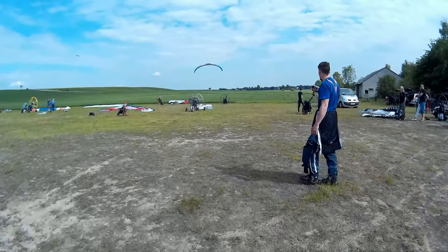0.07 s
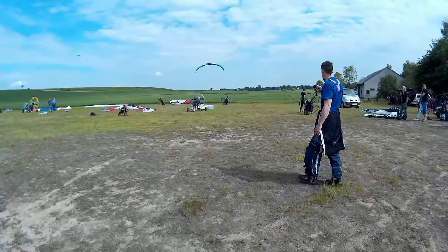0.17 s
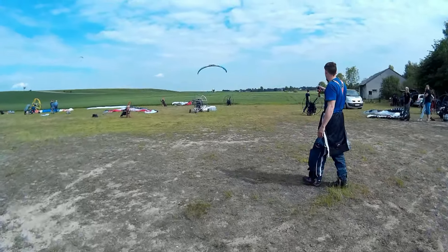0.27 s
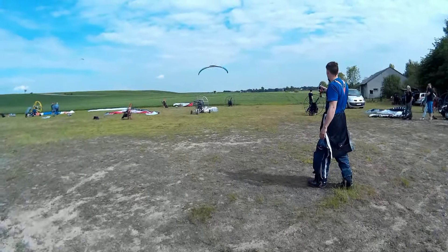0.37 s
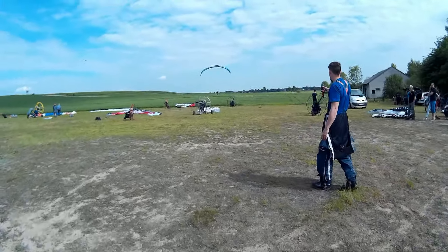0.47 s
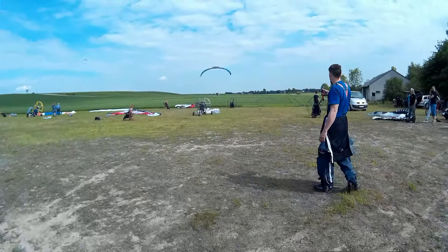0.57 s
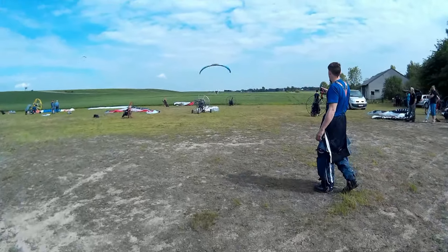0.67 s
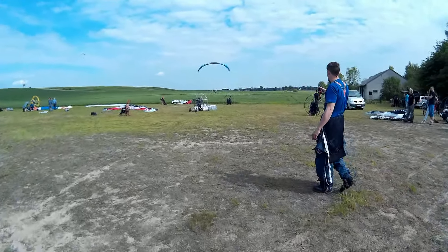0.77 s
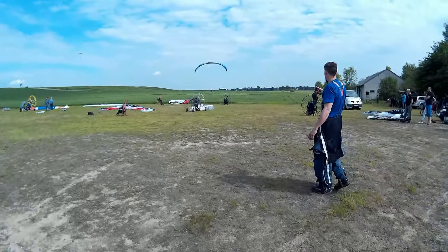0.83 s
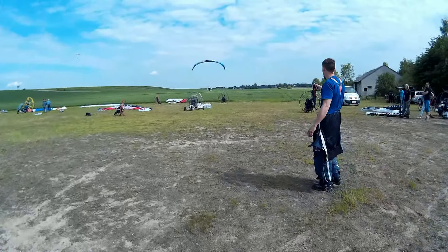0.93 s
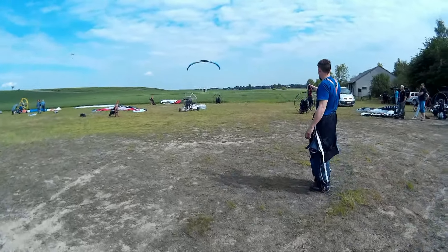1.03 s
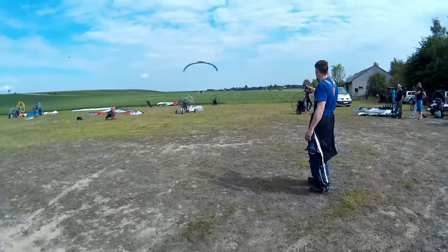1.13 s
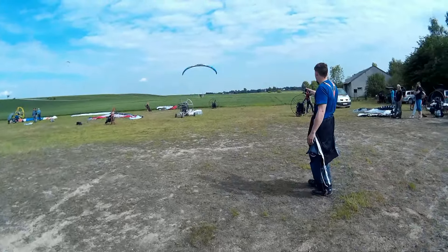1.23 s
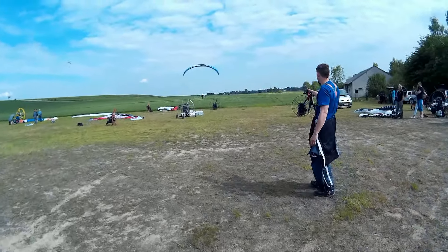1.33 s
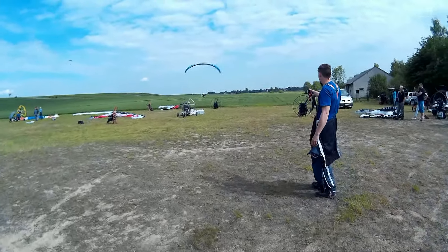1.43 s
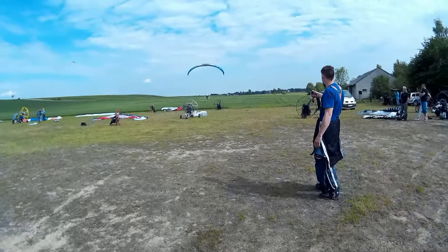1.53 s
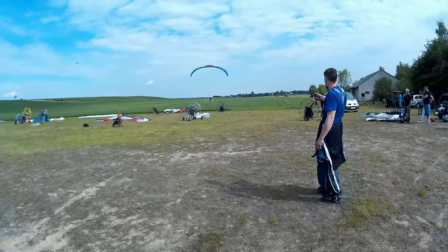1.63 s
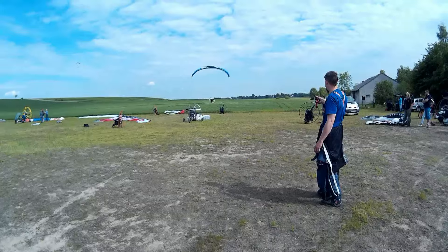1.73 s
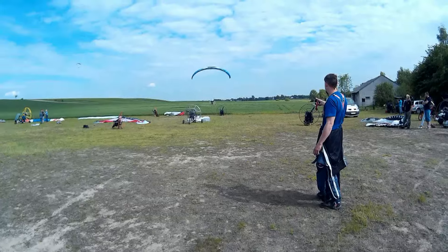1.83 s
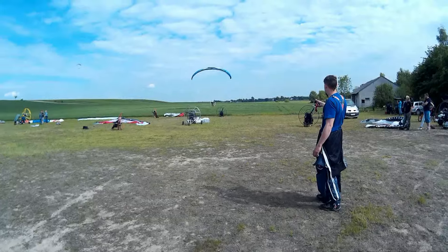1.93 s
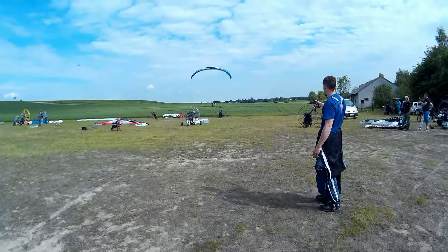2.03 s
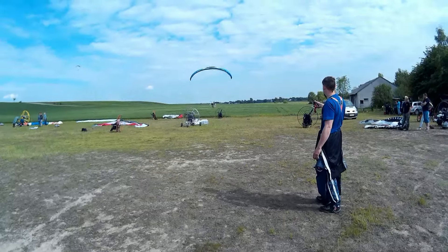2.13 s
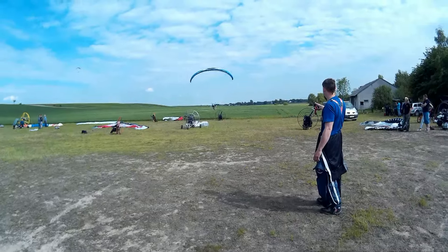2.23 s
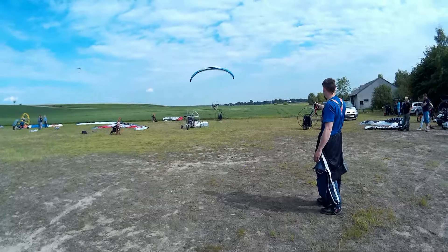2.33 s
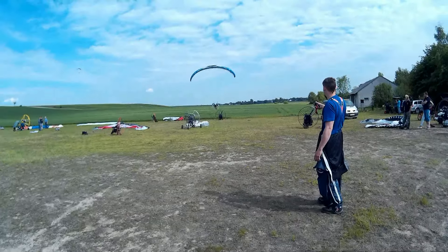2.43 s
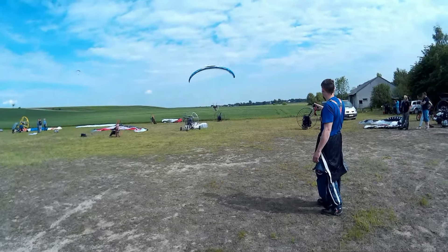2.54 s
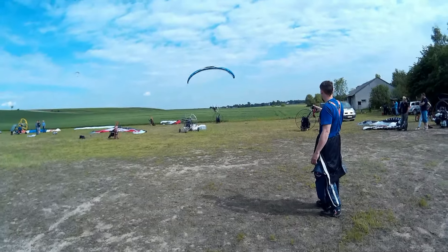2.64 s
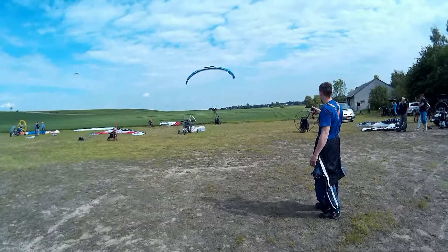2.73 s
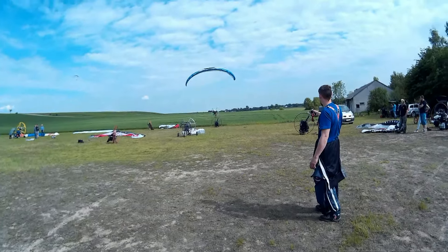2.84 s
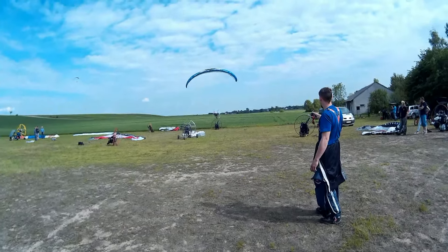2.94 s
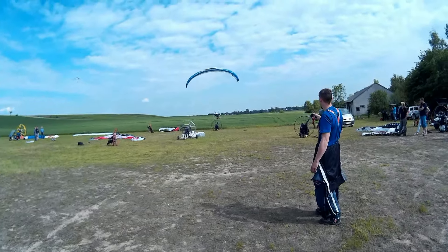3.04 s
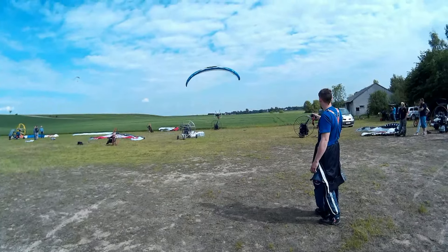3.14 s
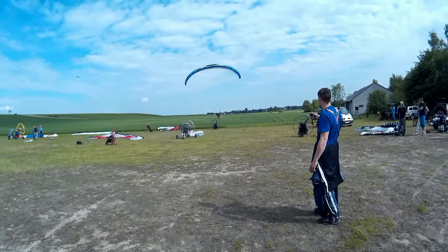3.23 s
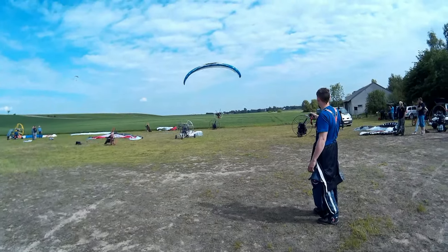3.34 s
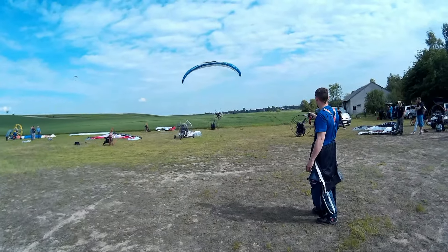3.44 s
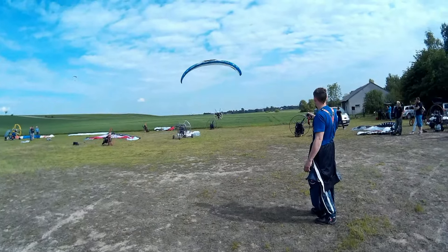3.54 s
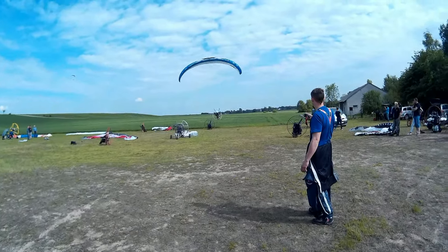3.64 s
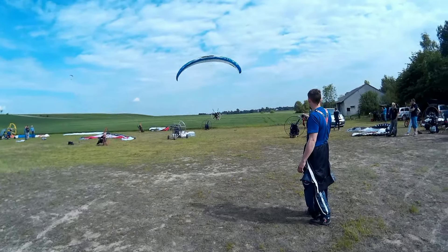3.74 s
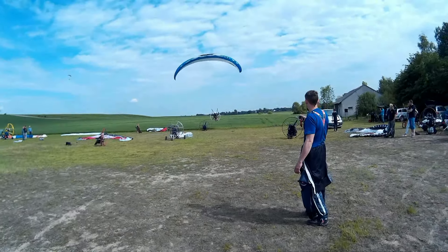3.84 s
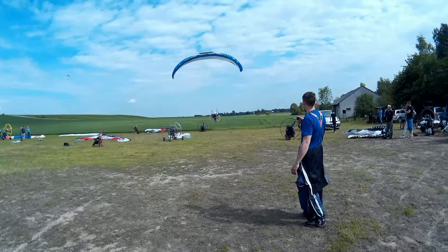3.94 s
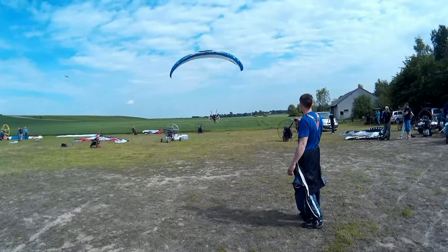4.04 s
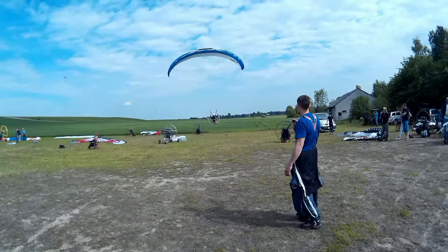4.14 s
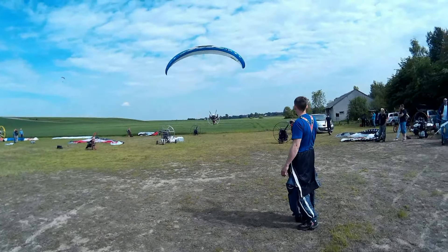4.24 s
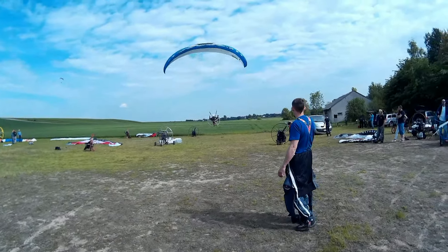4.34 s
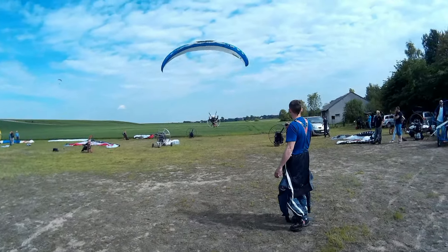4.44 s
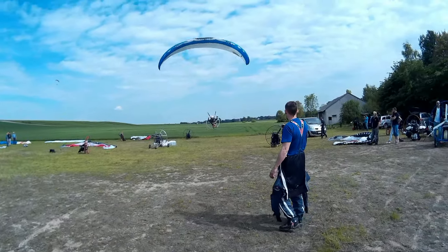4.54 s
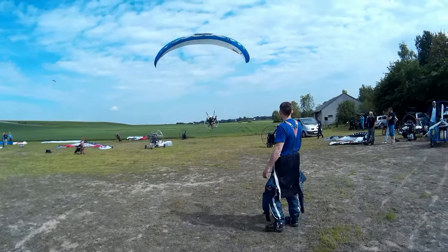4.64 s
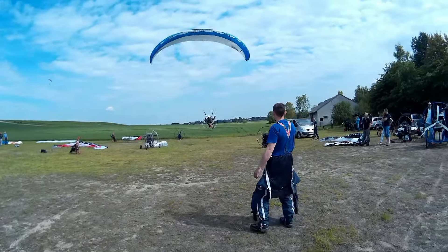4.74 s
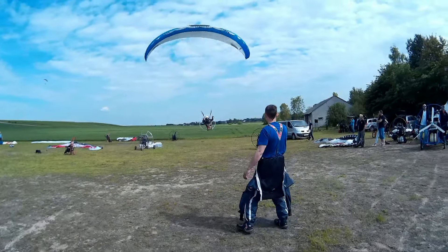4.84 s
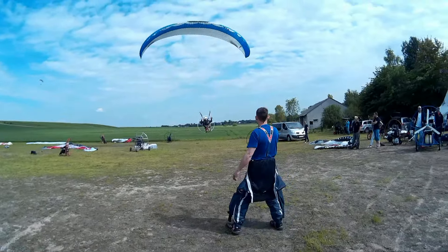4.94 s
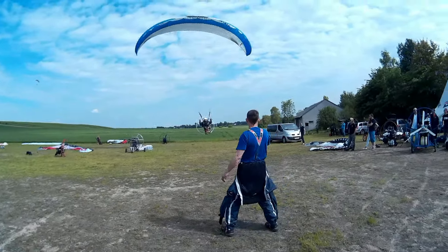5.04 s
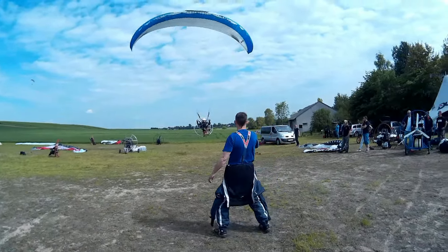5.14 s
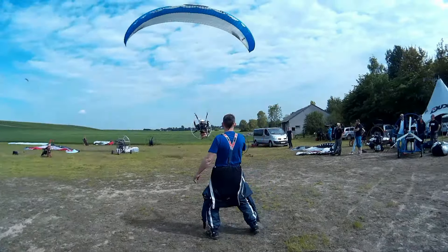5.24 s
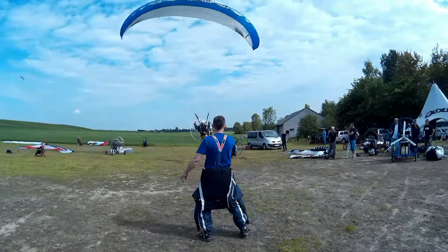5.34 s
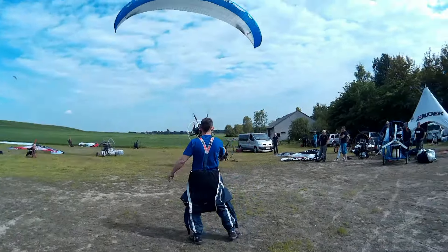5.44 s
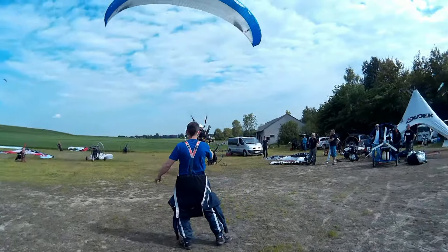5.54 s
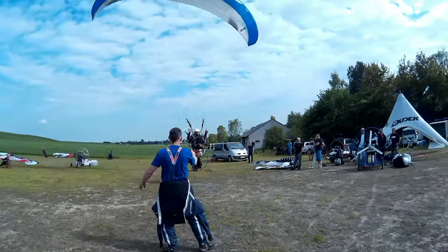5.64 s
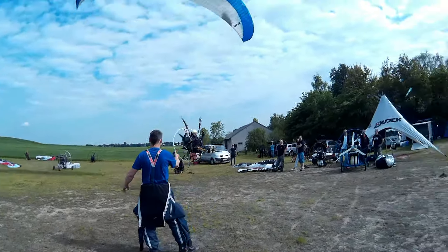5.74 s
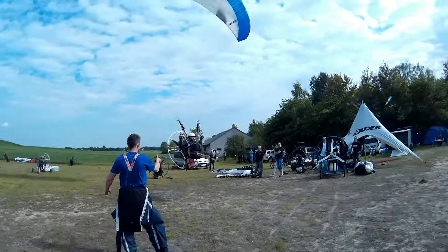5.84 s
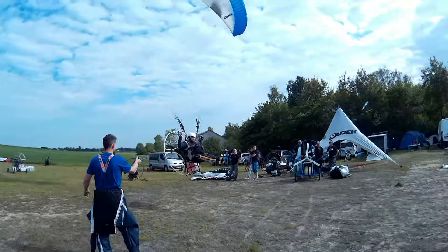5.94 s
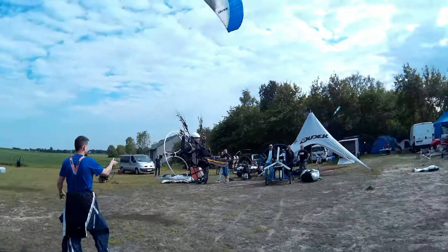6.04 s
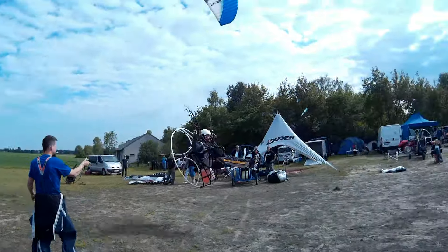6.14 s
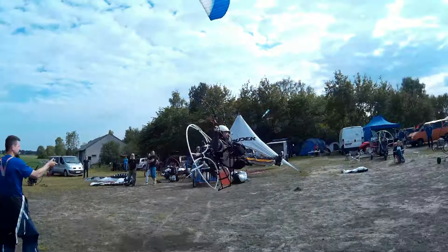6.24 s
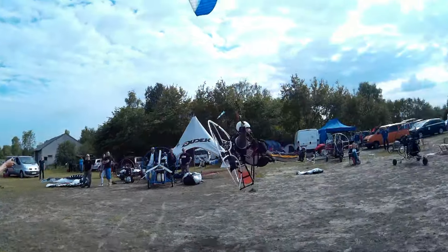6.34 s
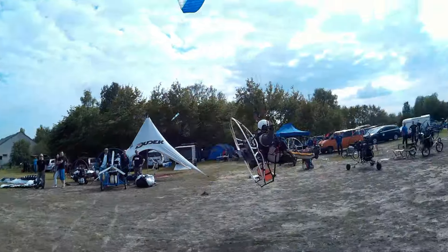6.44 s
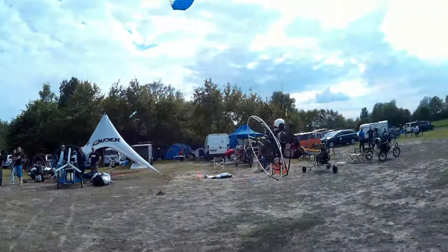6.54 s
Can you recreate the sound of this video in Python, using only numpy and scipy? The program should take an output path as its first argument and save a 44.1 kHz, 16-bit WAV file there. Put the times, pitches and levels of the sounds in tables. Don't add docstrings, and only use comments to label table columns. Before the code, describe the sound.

A paramotor flies in over open grassland toward a small camera. Its thin, nasal two-stroke buzz starts distant beneath gusty low wind rumble and a few soft knocks on the camera body. The pitch sags, recovers louder, then sags deeper with a ragged, airy roar. Power returns and the raspy propeller swells steadily, passing close and loud with a slight drop in pitch at the end.

```python
import sys
import numpy as np
from scipy import signal
from scipy.fft import rfft, irfft, next_fast_len
from scipy.io import wavfile
from scipy.ndimage import uniform_filter1d

SR = 44100
rng = np.random.default_rng(int(sys.argv[2]) if len(sys.argv) > 2 else 0)


def nominal_scale(level):
    x = np.asarray(level, float) / 20
    return 10 ** x


def store_wav(level_fs):
    pcm = np.round(np.clip(np.atleast_2d(level_fs), -1, 1) * 32767)
    wavfile.write(sys.argv[1], SR, pcm.T.astype(np.int16))


N = 291055
T = np.arange(N) / SR
GEAR = 1.4


def curves(table):
    s, *columns = np.transpose(table)
    return [np.interp(T, s, c) for c in columns]


def walk(rate_hz):
    fine = 8
    held = np.repeat(rng.standard_normal(int(T[-1] * rate_hz) + 2), fine)
    slewed = uniform_filter1d(uniform_filter1d(held, size=fine), size=fine)
    return np.interp(T * rate_hz * fine, np.arange(len(held)), 1.3 * slewed)


def noise(colour, centre_hz=None):
    size = next_fast_len(N)
    octave = np.log2(np.arange(1, size // 2 + 2) * SR / size)
    point_hz, point_db = np.transpose(colour)
    gain = nominal_scale(np.interp(octave, np.log2(point_hz), point_db))
    if centre_hz:
        thirds_away = np.clip((octave - np.log2(centre_hz)) * 3, -1, 1)
        gain = gain * np.cos(np.pi / 2 * thirds_away)
    spectrum = rfft(rng.standard_normal(size)) * gain
    return irfft(spectrum, size)[:N] * np.sqrt(SR / 2)


def ring(hz, width_hz, level_db, patchy_db):
    peak = noise([(hz / 3, -90), (hz - width_hz, -12), (hz, 0), (hz + width_hz, -12), (hz * 2, -90)])
    return nominal_scale(level_db + patchy_db * walk(17)) * peak / np.sqrt(width_hz)


# time in seconds, blade passes in Hz.
THROTTLE = [(0, 87.16), (.6, 87.7), (1.08, 95.2), (1.51, 83.8), (1.76, 83.04), (2.0, 73.78), (2.46, 72.6),
            (2.85, 85.2), (3.2, 87.8), (3.78, 84.03), (4.0, 64.77), (4.18, 59.05), (4.34, 58.1),
            (4.55, 70.27), (4.8, 79.25), (5.12, 85.92), (5.5, 88.97), (5.75, 81.02)]


def blade_pass_hz():
    inertia_s, pass_s, pass_width_s, doppler = .1, 6.4, .09, .024
    steady = uniform_filter1d(curves(THROTTLE)[0], size=int(inertia_s * SR))
    return steady * (1 - doppler * (1 + np.tanh((T - pass_s) / pass_width_s)))


# time in seconds, level in dB, churn of the air in dB, bite of the throttle in dB,
# side turned to the camera (0-1).
FLIGHT = [(0, -43, -1.5, -1, 0.07), (1.0, -41, -0.5, 1.5, 0.16), (1.7, -37.5, -3.5, -2.5, 0.21),
          (2.05, -42, 0.5, -2.5, 0), (2.45, -40, 0, -2, 0), (2.7, -34.5, 0, -4, 0),
          (3.0, -34, -0.5, 4.5, 0.06), (3.4, -35.5, -2, 5.5, 0.19), (3.75, -35, 1.5, 4.5, 0.26),
          (4.0, -38, 5.5, 2, 0.14), (4.3, -35.5, 6, -1.5, 0.2), (4.6, -34, 9, 1.5, 0.12),
          (5.0, -32, 4, -1, 0.34), (5.3, -32, -2, -5.5, 0.45), (5.72, -28.5, -5.5, -4, 0.56),
          (5.9, -26, -1, -2, 0.48), (6.15, -24.5, 1, 2.5, 0.81), (6.6, -24, 2, 3, 1)]


def mix(rows):
    level, churn, bite, side = curves(FLIGHT)
    return [level + db + a * churn + b * bite + side_db * side for db, a, b, side_db in rows]


# time in seconds, low dip in Hz, its depth in dB, high dip in Hz, its depth in dB.
DIPS = [(0, 292, 23, 810, -0.5), (1.2, 274, 13, 840, 8.5), (1.6, 291, 15.5, 810, 15),
        (2.4, 273, 28, 860, 7), (2.75, 300.9, 18, 725, -2), (3.0, 286, 19, 680, 7),
        (3.4, 265, 7, 650, 4), (3.6, 270, 0, 730, 16), (4.0, 280, -2.5, 700, 28),
        (4.4, 273, 3, 690, 7), (4.55, 279, 11, 560.5, 3), (5.0, 300.7, 9.5, 544.2, 8),
        (5.35, 293.2, 0, 720, 4), (5.7, 268.5, 6, 747, 12), (6.0, 254.6, 10.5, 840.3, 0),
        (6.2, 244.8, 12, 1052, 6), (6.5, 308.9, 14, 1000, 3)]


def dips_db(hz):
    def dip(centre_hz, depth_db, octaves):
        return np.maximum(depth_db, 0) * np.exp(-(np.log2(hz / centre_hz) / octaves) ** 2)

    low_hz, low_db, high_hz, high_db = curves(DIPS)
    return -dip(low_hz, low_db, 0.3) - dip(high_hz, high_db, 0.15)


# time in seconds, factor.
ROUGH = [(0, 1.2), (2.35, 1.3), (2.55, .8), (3.8, .7), (4.1, .9), (4.45, .75), (4.8, .6), (6.6, .55)]


def stack(turns, levels_db, slow_db, quick_db, jitter, blur):
    rough = curves(ROUGH)[0]
    shift = jitter * rough * walk(25)
    out = 0
    for k, db in enumerate(levels_db, 1):
        waver = min(k / 8, 1)
        smear = .06 * k * rough ** 2 * walk(30)
        phase = 2 * np.pi * k * (turns + shift) + blur * waver * walk(4) + smear
        swing_db = np.minimum(slow_db * walk(3) + quick_db * rough * walk(12), 3)
        out = out + np.sqrt(2) * nominal_scale(db + waver * swing_db) * np.cos(phase)
    return out


# level beside the flight in dB, share of churn, share of bite, change when side on in dB.
THUMP_MIX = [
    (-15.5, -0.037, 0.054, 12),
    (-6.5, -0.23, 0, 4.5),
    (-8.5, 0, 0.035, -3.5),
]
BUZZ_MIX = [
    (-9, 0.065, 0.37, -3.5),
    (-7.5, -0.011, 0.75, -16),
    (-14, -0.1, 0.043, -7.5),
    (-16, -0.34, 0.39, -6.5),
]
TIP_MIX = [(-4.5, 0, 0.63, -11.5)]
THRUST_DB = [1, 17, -4.5, -2, -4.5]
# time in seconds, level in dB.
BEAM = [(0, -1), (1.0, 0), (1.6, 1), (2.4, -0.5), (2.6, 0.5), (3.1, 4), (3.7, 3.5), (4.0, -1), (4.3, 0),
        (4.7, 7.5), (5.0, 7), (5.5, 5), (5.9, 4), (6.2, -2), (6.6, 3)]
# frequency in Hz, level in dB.
BUZZ_COLOUR = [(450, -2), (650, 1), (800, 0), (950, 0), (1150, -6), (1400, -7), (1700, -4.5), (2100, -19),
               (2600, -15.5)]


def propeller(turns, hz):
    cruise_hz = 87
    octaves = np.log2(hz / cruise_hz)
    beam = curves(BEAM)[0]
    fourth, fifth, middle, high = mix(BUZZ_MIX)
    tips = mix(TIP_MIX)[0] - curves(FLIGHT)[0]
    thrust = mix(THUMP_MIX) + [fourth, fifth]
    levels = [db + gain_db * octaves for db, gain_db in zip(thrust, THRUST_DB)]
    colour_hz, colour_db = np.transpose(BUZZ_COLOUR)
    for k in range(6, 29):
        buzz = middle + 0.2 * beam if k < 9 else high + beam
        tip_share = np.clip((k - 13) / 4, 0, 1)
        levels.append(buzz + tips * tip_share + np.interp(k * hz, colour_hz, colour_db))
    for k in range(1, 15):
        levels[k - 1] = levels[k - 1] + dips_db(k * hz)
    return stack(turns, levels, slow_db=1.0, quick_db=2.5, jitter=0.009, blur=1.11)


EXHAUST_MIX = [
    (-16.5, 0.018, 0.094, 0),
    (-26, 0.01, 0.035, 22),
    (-32, 0.0081, 0.43, 15),
]
# multiple of the firing rate, level beside its mix in dB.
SILENCER = [(2, -19), (3, -18), (5, -3), (6, -1.5), (7, 7), (8, 9), (9, 6.5), (10, 4.5), (11, -4.5),
            (12, 1.5), (13, -12.5), (14, -25), (15, -10), (16, -12.5)]
# time in seconds, 4th multiple in dB, 5th in dB, those above in dB.
OUTLET = [(0, 4.5, 3, -1), (5.0, -10, -6, 0.5), (5.4, -9, 12, -2.5), (5.7, -6, 4.5, -1), (5.95, -1, 7, 0.5),
          (6.1, -1, -2.5, -4.5), (6.28, -23, -2.5, -0.5), (6.6, -11, -2.5, -0.5)]


def exhaust(turns):
    tone, middle, high = mix(EXHAUST_MIX)
    fourth, fifth, above = curves(OUTLET)
    upper = []
    for k, db in SILENCER:
        swing = fifth * (k == 5) + above * (k > 5)
        upper.append((middle if k < 7 else high) + db + swing)
    upper.insert(2, middle + fourth)
    levels = [tone] + upper
    return -stack(GEAR * turns, levels, slow_db=2.0, quick_db=2.0, jitter=0.0036, blur=1.3)


MISFIRE_MIX = [(-20.5, 0.32, -.5, -7.5)]


def misfire():
    return ring(574, 110, mix(MISFIRE_MIX)[0], patchy_db=1.8)


AIR_HZ = [350, 650, 1100, 1450, 1900, 4000]
AIR_MIX = [(-15.5, 0.37, 0.078, -12), (-10, 0.015, 0.17, -4), (-13, 1.5, 0, 1), (-15.5, 0.73, 0.79, -3),
           (-21.5, 0.032, 0.86, 3), (-40, 0.77, 0.6, 4)]
# frequency
# in Hz, level in dB per Hz.
AIR_COLOUR = [(60, 0), (200, 5), (500, 1.5), (680, -0.5), (800, -1), (1100, 0.5), (1600, 0.5), (2200, -2),
              (2800, -1), (3150, -5.5),
              (3700, -0.5), (4400, -3.5), (5350, -7.5), (5800, -13.5), (6800, -17.5), (7600, -11.5),
        (9300, -18.5), (10500, -20), (11800, -17), (13500, -22)]


def torn_air(turns):
    levels = np.array(mix(AIR_MIX)) - 10 * np.log10(np.array(AIR_HZ)[:, None] * 0.53)
    swell = walk(6)
    roar = 0
    for hz in 63 * 2 ** (np.arange(25) / 3):
        place = np.interp(np.log(hz), np.log(AIR_HZ), np.arange(6))
        k = min(int(place), 4)
        db = levels[k] + (place - k) * (levels[k + 1] - levels[k])
        if hz < 1500:
            db = db + 0.26 * dips_db(hz)
        flicker_db = 0.5 * swell + 0.92 * walk(11)
        roar = roar + nominal_scale(db + flicker_db) * noise(AIR_COLOUR, hz)
    blade = 1 + 0.14 * np.cos(2 * np.pi * turns)
    firing = 1 + 0.22 * np.cos(2 * np.pi * GEAR * turns)
    return roar * blade * firing


# peak time in seconds, level in dB, length in seconds.
GUSTS = [(0, -52, 0.16), (0.597, -50, 0.18), (.77, -60, 0.046), (1.008, -51, 0.037), (1.177, -52, 0.078),
         (1.397, -61, 0.035), (1.65, -60, 0.053), (2.097, -55, 0.16), (2.564, -58, .1),
         (2.873, -58.5, 0.22), (3.32, -58, 0.17), (3.602, -61, .1), (3.965, -50, 0.13), (4.249, -64, 0.29),
         (5.999, -47, 0.056), (6.101, -48, 0.061), (6.6, -64, 0.039)]


def breeze():
    rumble = noise([(10, -34.5), (30, -12.5), (60, -20.5), (130, -21.0), (250, -47), (1000, -80)])
    gusts = nominal_scale(-72.5)
    for s, db, length_s in GUSTS:
        gusts = gusts + nominal_scale(db) * np.exp(-((T - s) / length_s) ** 2)
    return gusts * nominal_scale(0.88 * walk(5.1)) * rumble


# frequency in Hz, level in dB per Hz.
HISS = [(1000, -113), (3000, -113), (5000, -115), (8000, -115.5), (11000, -116.5), (14000, -119),
        (15000, -123), (15700, -133)]


def hiss():
    return nominal_scale(.5 * walk(8) + .6 * walk(30)) * noise(HISS)


# time in seconds, peak level in dB, pitch in Hz.
KNOCKS = [
    (0.139, -39.5, 45),
    (0.333, -36, 108),
    (.6, -47, 60),
    (1.109, -35, 115),
]


def knocks():
    out = 0
    for s, db, hz in KNOCKS:
        cycles = (T - s) * hz
        out = out + nominal_scale(db) * np.exp(-cycles ** 2) * np.sin(2 * np.pi * cycles)
    return out


# time in seconds, level in dB, hold in seconds.
SLIPS = [
    (2.75, -72.5, 0.41),
    (4.6, -84, .05),
]


def belt():
    rise_db_s, fall_db_s = 49, 32.5
    slips = []
    for s, db, hold_s in SLIPS:
        rising = rise_db_s * np.maximum(s - T, 0)
        fading = fall_db_s * np.maximum(T - s - hold_s, 0)
        slips.append(db - rising - fading)
    return ring(4070, 450, np.max(slips, axis=0), patchy_db=1.5)


def scene():
    hz = blade_pass_hz()
    turns = np.cumsum(hz) / SR
    machine = propeller(turns, hz) + exhaust(turns) + misfire() + torn_air(turns) + belt()
    microphone = breeze() + hiss() + knocks()
    return (machine + microphone)[None]


def top_cut(x):
    return signal.sosfilt(signal.butter(12, 15720, fs=SR, output="sos"), x)


def record(dry):
    closing = np.minimum((T[-1] - T) / .003, 1)
    bass_cut = signal.butter(1, 25, "high", fs=SR, output="sos")
    return top_cut(closing * signal.sosfilt(bass_cut, dry))


dry = scene()
out = record(dry)
store_wav(out)
```